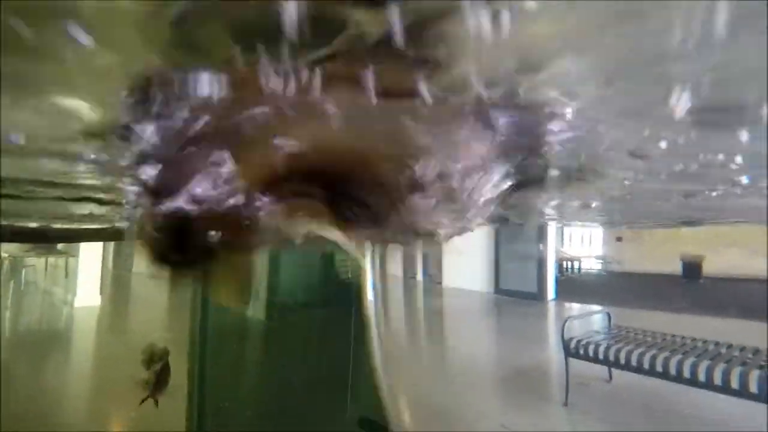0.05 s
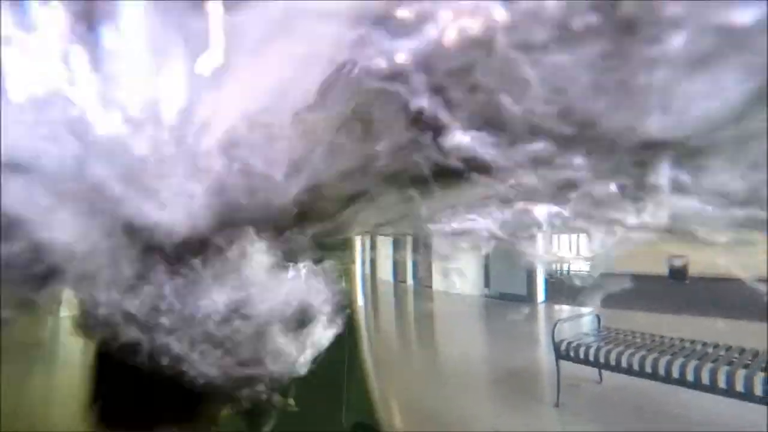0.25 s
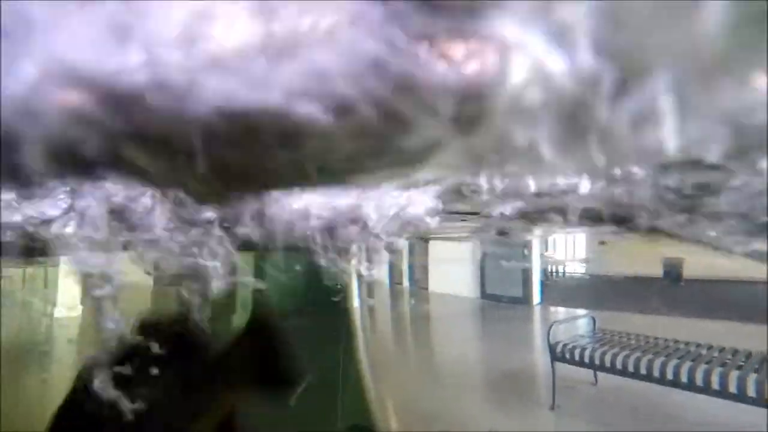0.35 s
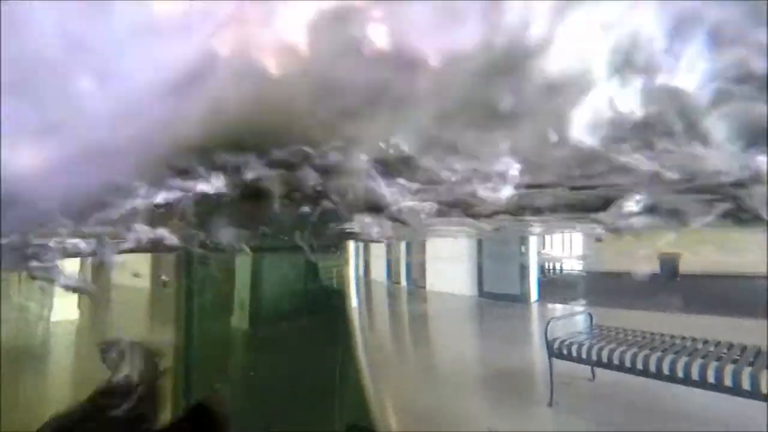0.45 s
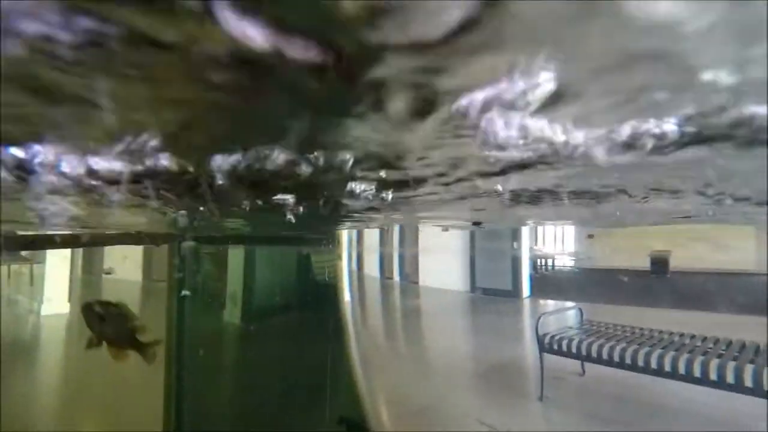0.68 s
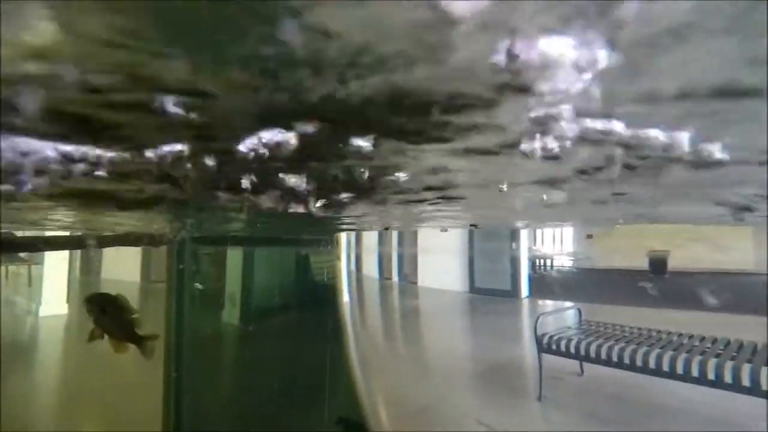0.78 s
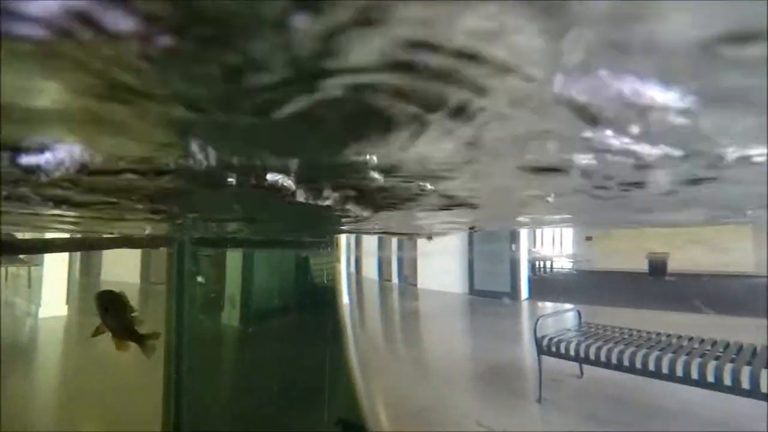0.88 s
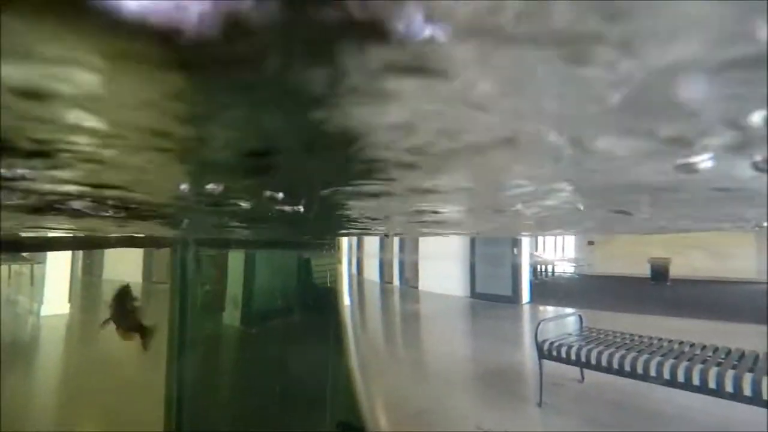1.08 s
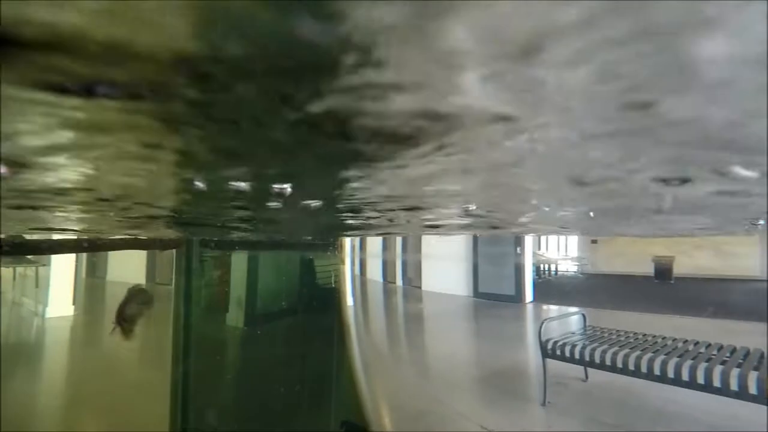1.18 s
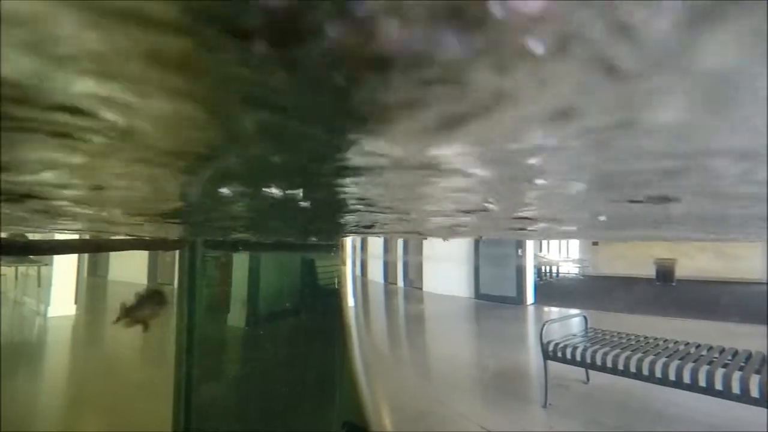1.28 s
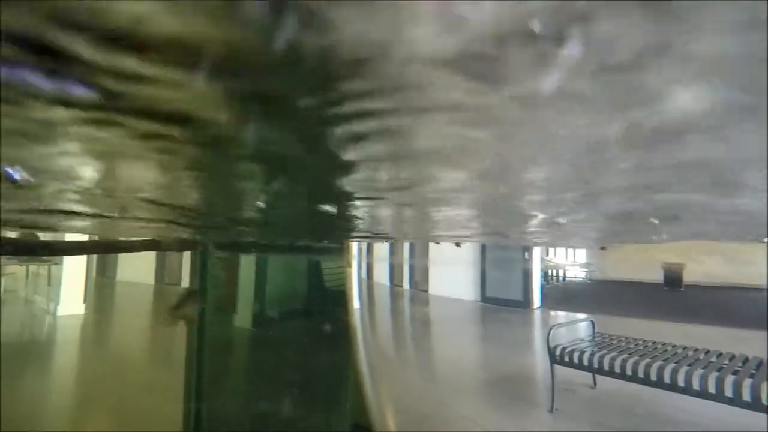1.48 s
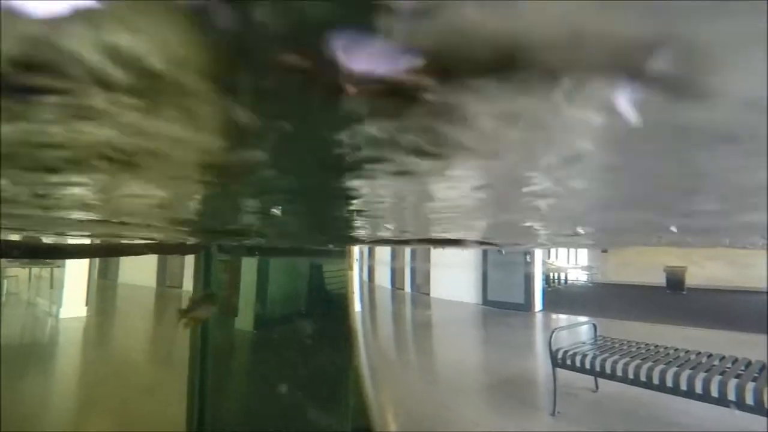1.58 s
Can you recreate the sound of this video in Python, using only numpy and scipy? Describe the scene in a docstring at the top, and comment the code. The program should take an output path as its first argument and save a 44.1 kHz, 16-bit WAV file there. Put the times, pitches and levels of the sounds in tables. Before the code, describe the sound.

A fish splashes at the surface of an indoor tank, heard from a microphone in the water. A soft thud and a few bubbles lead into two quick, fizzy splashes with low thumps, then drops tick and the water settles.

```python
"""A low thud and a few bubbles come first, then a splash: a fish lunges at the surface of an indoor
tank, heard from a waterproof housing in the water. Trapped air resonates as rising bubbles, the
splash throws a dense spray of small ones, and falling drops strike the housing into brief ringing.
Surges rock the housing with low thuds; then the water settles to a faint rumble and stray bubbles."""
import sys
import numpy as np
from scipy import signal
from scipy.io import wavfile
from scipy.ndimage import uniform_filter1d

SR = 44100
rng = np.random.default_rng(int(sys.argv[2]) if len(sys.argv) > 2 else 0)


def output_pcm(signal):
    """Save a mono or channel-first signal as 16-bit PCM at the path in sys.argv[1].

    Samples are clipped to [-1, 1] before scaling.
    """
    pcm = np.clip(np.atleast_2d(signal).T, -1, 1) * 32767
    wavfile.write(sys.argv[1], SR, np.round(pcm).astype(np.int16))


N = 72765

# single bubbles close by (t/s, f/Hz, level/dB, life/s)
NEAR_BUBBLES = [(.047, 590, -28, 0.0068), (0.087, 1040, -31.5, 0.0086), (.157, 650, -26.5, .02),
                (0.1666, 2150, -30, 0.0052), (.2052, 728, -19.5, 0.0037), (.2318, 2080, -22.5, 0.0047),
                (0.242, 3800, -15, 0.0017), (.2514, 2350, -11.5, 0.003), (0.2555, 6100, -12, 0.0016),
                (0.2563, 2000, -12.5, 0.0024), (.2588, 830, -15.5, 0.0027), (0.2636, 1155, -17.5, 0.0035),
                (0.2752, 2120, -14.5, .003), (0.2841, 2690, -14, 0.0056), (0.286, 2240, -10, 0.0018),
                (.302, 701, -20.5, 0.021), (0.3045, 3950, -22, 0.0032), (0.3562, 1800, -5.5, .0025),
                (0.36, 8390, -2.5, .0013), (0.3596, 6270, -9.5, 0.0018), (0.362, 1846, -8.5, .002),
                (0.3662, 7900, -13.5, 0.0011), (.3835, 4545, -26.5, 0.0034), (.4556, 1010, -27, 0.0097),
                (.476, 1830, -31.5, 0.011), (0.577, 1760, -29.5, 0.0027), (0.5846, 3150, -20.5, 0.00095),
                (0.5875, 2500, -26.5, 0.0031), (0.6848, 1850, -34.5, .008), (1.2807, 1540, -24, 0.0045)]
# churning of the water (t/s, spray level/dB, gurgle level/dB)
CHURN_LEVELS = [(0, -52, -52.5), (.12, -54, -43.5), (.218, -43.5, -43.5), (.238, -23.5, -31.5),
                (.262, -20, -21.5), (.275, -29, -41), (.30, -37, -26), (.343, -37.5, -31),
                (.362, -21.5, -28.5), (.388, -39.5, -39), (.445, -42, -45), (.59, -48.5, -51),
                (.665, -61.5, -56), (1.03, -64, -62), (1.65, -66, -67)]
# transmission of small bubbles and slaps through the housing (f/Hz, gain/dB)
TRANSMISSION = [(250, -13.5), (680, 8), (880, -1), (1060, 5), (1350, -7), (2150, 5.5), (2800, -3),
                (3400, -2), (5000, -5), (6400, 7), (7200, -8.5), (8300, -1.5), (11000, -2.5), (13000, -7)]
# drops on the housing (t/s, knock level/dB, snap level/dB, snap f/Hz)
DROP_IMPACTS = [(0.2318, -17.5, -18.5, 7380), (0.2371, -24, -15, 12380), (0.2443, -11, -28, 9200),
                (0.259, -12.5, -23, 12560), (.264, -4, -20, 12940), (0.2825, -11, -21, 9800),
                (0.3597, -2.5, -19, 8660), (.380, -20, -20, 8840), (0.475, -33, -30.5, 7950),
                (.531, -31, -20.5, 8060), (0.6501, -34, -52, 6360), (.680, -30.5, -21.5, 13200),
                (0.6805, -23, -13, 8060), (0.7016, -18.5, -20.5, 13100), (0.72, -30, -20, 12300),
                (0.7722, -34.5, -49.5, 5000), (0.8938, -46, -59.5, 8200), (0.9993, -33, -53, 6320),
                (1.048, -35.5, -37.5, 9800), (1.089, -39.5, -62, 6400), (1.2241, -41, -58.5, 4000)]
# normal modes of the housing (f/Hz, relative level/dB)
HOUSING_MODES = [(1030, -12.5), (1430, -10), (1900, -1), (2326, 0.5), (2787, 1), (3140, -5), (3985, -4.5),
                 (5200, -9)]
# wet slaps of water, and at 1.36 s the faint pop of a small bubble, heard as a short noise burst (t/s,
# level/dB, life/s, upper band edge f/Hz)
WATER_SLAPS = [(0.3565, -17, 0.0034, 10000), (0.365, -24, .007, 6470), (0.7189, -28, 0.0032, 4000),
               (.843, -43, 0.0028, 3036), (1.36, -50, .01, 3900)]
# surges against the housing (t/s, rocking f/Hz, rocking level/dB, life/s, slosh level/dB)
WATER_SURGES = [(.0, 46.6, -21.5, 0.012, -36), (.05, 58.5, -45, 0.0099, -33.5),
                (0.199, 39.2, -31, 0.033, -59), (0.251, 57.4, -16, 0.019, -26.5),
                (.297, 29.83, -13.5, 0.053, -33), (0.363, 70.9, -10, 0.052, -20),
                (.4545, 70, -20.5, 0.041, -26), (0.569, 69, -29.5, 0.014, -39),
                (0.944, 47.4, -36, 0.075, -42.5), (1.025, 66.2, -32.5, 0.076, -40),
                (1.372, 60.8, -33.5, 0.024, -47.5)]
# reverberation of the tank (f/Hz, time to fall 60 dB/s)
TANK_DECAY = [(200, 0.12), (700, 0.17), (3500, .15), (8000, 0.0273)]
# spectral density of the rumble (f/Hz, relative level/dB)
RUMBLE_SPECTRUM = [(10, -4), (30, 0.5), (72, -2.5), (92, -13.5), (122, -15.5), (160, -21), (600, -46.5),
                   (2000, -82)]
# envelope of the rumble (t/s, level/dB)
RUMBLE_ENVELOPE = [(0, -29), (.14, -45.5), (.25, -19.5), (.38, -21), (.5, -33.5), (.66, -45), (1.05, -44),
                   (1.65, -45.5)]
# spectral density of the hiss (f/Hz, relative level/dB)
HISS_SPECTRUM = [(700, -8.5), (1400, -9.5), (2200, -4.5), (3300, -6), (10000, -13.5), (15000, -16),
                 (16000, -32)]

BUBBLE_RISE, BUBBLE_ONSET_CYCLES = 0.05, 0.8  # rise: share of the pitch gained over one life
GULP_START_S, GULP_HZ, GULP_DB, GULP_LIFE_S = 0.4548, 609.6, -18.5, 0.028
FIZZ_DB, FIZZ_POWER = -3, 1.38  # the fizz grows faster than the spray
KNOCK_RISE_S, RING_CYCLES = 0.000043, 36  # a mode falls 60 dB in about this many cycles
SNAP_RING_S, SNAP_NOISE_S, SNAP_NOISE_DB, SNAP_WIDTH_HZ = 0.00072, 0.00095, -1, 1300
SURGE_RISE_S, SLOSH_S, SLOSH_HZ = 0.0035, 0.0069, 853
THUD_BAND_HZ, THUD_S, THUD_DB = (114, 286), 0.013, -3.5  # level relative to the slosh
TANK_DB, HISS_DB = -21, -68


def bubble(hz, life, rise, steepness=2.2):
    """Trapped air is a spring loaded by water: it rings, climbing in pitch as it nears the surface."""
    t = np.arange(0, 4 * life, 1 / SR)
    cycles = np.cumsum(hz * (1 + rise * t / life)) / SR
    onset = 1 - np.exp(-cycles / BUBBLE_ONSET_CYCLES)
    return np.sin(2 * np.pi * cycles) * onset * np.exp(-(t / life) ** steepness)


def flutter(x, depth_db=0.5, cutoff_hz=132):
    """Amplitude modulation: moving water makes a bubble's loudness waver at random."""
    return x * amp(depth_db * band_noise(SR, cutoff_hz)[:len(x)])


def near_bubbles():
    """Single bubbles oscillate freely, and the cavity behind the fish closes with a gliding gulp."""
    out = np.zeros(N)
    for start, hz, db, life in NEAR_BUBBLES:
        add(out, start, amp(db) * flutter(bubble(hz, life, BUBBLE_RISE)))
    gulp = bubble(GULP_HZ, GULP_LIFE_S, rise=0.19, steepness=3.7)
    add(out, GULP_START_S, amp(GULP_DB) * flutter(gulp))
    return out


def swarm(low_hz, high_hz, per_s, cycles, spread_db, sizes=40):
    """Incoherent superposition of many small bubbles, held at a steady overall level."""
    out = np.zeros(N)
    for hz in np.geomspace(low_hz, high_hz, sizes):
        births = rng.random(N) < per_s / sizes / SR
        strength = amp(spread_db * np.minimum(rng.exponential(1, N), 3))
        life = cycles * rng.uniform(0.38, 1.8) / hz
        out += signal.oaconvolve(births * strength, bubble(hz, life, rise=0.0035))[:N]
    out = colour(out, TRANSMISSION)
    power = uniform_filter1d(uniform_filter1d(out ** 2, size=1300), size=1300)
    return out / np.sqrt(abs(power) + 0.02 * np.mean(out ** 2))


def churn():
    """Smaller bubbles resonate higher: stirred water gives a deep gurgle, bright spray and fine fizz."""
    spray = swarm(1250, 4630, per_s=1800, cycles=6.1, spread_db=4.5)
    gurgle = swarm(230, 1224, per_s=600, cycles=3.8, spread_db=3)
    fizz = swarm(4800, 16000, per_s=3800, cycles=9, spread_db=4)
    spray_gain, gurgle_gain = envelope(CHURN_LEVELS, column=1), envelope(CHURN_LEVELS, column=2)
    return spray * spray_gain + gurgle * gurgle_gain + fizz * amp(FIZZ_DB) * spray_gain ** FIZZ_POWER


def knock(t):
    """An impact excites the normal modes of the housing; the higher modes are damped sooner."""
    ring = np.zeros(len(t))
    for hz, db in HOUSING_MODES:
        decay = amp(db - 60 * t * hz / RING_CYCLES)
        ring += rng.choice([-1, 1]) * decay * np.sin(2 * np.pi * hz * rng.uniform(0.93, 1.03) * t)
    ring *= 1 - np.exp(-t / KNOCK_RISE_S)
    return ring / abs(ring).max()


def snap(t, hz):
    """Damped oscillation of a tiny bubble, its spectrum broadened by the noise of the splash."""
    splash = amp(SNAP_NOISE_DB) * band_noise(len(t), SNAP_WIDTH_HZ) * np.exp(-t / SNAP_NOISE_S)
    onset = 1 - np.exp(-t * hz / BUBBLE_ONSET_CYCLES)
    return np.sin(2 * np.pi * hz * t) * onset * (np.exp(-t / SNAP_RING_S) + splash)


def drops():
    """Impulsive excitation: each drop knocks the housing and sets a tiny bubble ringing."""
    out, t = np.zeros(N), np.arange(SR // 20) / SR
    for start, knock_db, snap_db, snap_hz in DROP_IMPACTS:
        add(out, start, amp(knock_db) * knock(t) + amp(snap_db) * snap(t, snap_hz))
    return out


def slaps(low_hz=1100):
    """A sheet of water breaks on the surface, or a small bubble pops: a broadband transient, filtered by the
    housing."""
    out, t = np.zeros(N), np.arange(SR // 20) / SR
    for start, db, life, top_hz in WATER_SLAPS:
        burst = band_noise(len(t), (low_hz, top_hz), "bandpass") * np.exp(-t / life)
        add(out, start, amp(db) * burst)
    return colour(out, TRANSMISSION)


def surges():
    """Each surge lands with a dull slosh and a thud, and rocks the housing in a damped oscillation."""
    out, t = np.zeros(N), np.arange(SR // 2) / SR
    for start, hz, db, life, slosh_db in WATER_SURGES:
        onset = 1 - np.exp(-t / SURGE_RISE_S)
        rocking = np.sin(2 * np.pi * hz * t) * onset * np.exp(-(t / life) ** 2)
        slosh = band_noise(len(t), SLOSH_HZ, order=4) * np.exp(-t / SLOSH_S)
        thud = band_noise(len(t), THUD_BAND_HZ, "bandpass") * np.exp(-t / THUD_S)
        add(out, start, amp(db) * rocking + amp(slosh_db) * (slosh + amp(THUD_DB) * thud))
    return out


def tank_echoes(x):
    """Reverberation: short, dense reflections between the glass walls, in which the treble dies first."""
    hz, t, spectra = signal.stft(rng.standard_normal(SR // 2), SR, nperseg=256)
    decay = amp(-60 * t / at_frequency(TANK_DECAY, hz)[:, None])
    _, tail = signal.istft(spectra * decay, SR, nperseg=256)
    return signal.fftconvolve(x, tail / np.linalg.norm(tail))[:N]


def background():
    """Noise with a continuous spectrum: the low rumble of rocking water over a steady hiss."""
    rumble = unit_rms(colour(rng.standard_normal(N), RUMBLE_SPECTRUM))
    hiss = unit_rms(colour(rng.standard_normal(N), HISS_SPECTRUM))
    return rumble * envelope(RUMBLE_ENVELOPE) + amp(HISS_DB) * hiss


def band_noise(samples, edges_hz, kind="lowpass", order=2):
    """White noise confined to a band, at rms 1."""
    band = signal.butter(order, edges_hz, kind, fs=SR, output="sos")
    return unit_rms(signal.sosfilt(band, rng.standard_normal(samples)))


def colour(x, spectrum):
    """Minimum-phase filtering: a causal response with the given spectrum."""
    log_gain = np.log(amp(at_frequency(spectrum, abs(np.fft.fftfreq(N, 1 / SR)))))
    response = np.exp(np.conj(signal.hilbert(log_gain)))
    return np.fft.ifft(np.fft.fft(x) * response).real


def at_frequency(table, hz):
    """Interpolation on a logarithmic frequency axis."""
    f, value = np.transpose(table)
    return np.interp(np.log(hz + 1), np.log(f + 1), value)


def envelope(table, column=1):
    """Amplitude over time, interpolated in decibels."""
    rows = np.array(table)
    return amp(np.interp(np.arange(N) / SR, rows[:, 0], rows[:, column]))


def amp(db):
    """Amplitude ratio of a level in decibels."""
    return 10 ** (np.asarray(db) / 20)


def unit_rms(x):
    """Normalisation to rms 1."""
    return x / np.sqrt(np.mean(x ** 2) + 1e-20)


def add(mix, start, sound):
    """Superposes a sound from a start time in seconds."""
    part = mix[max(round(start * SR), 0):][:len(sound)]
    part += sound[:len(part)]


def scene():
    """Superposition at one microphone; near bubbles, drops and slaps also reverberate."""
    near = near_bubbles() + drops() + slaps()
    return (near + amp(TANK_DB) * tank_echoes(near) + churn() + surges() + background())[None]


def record(dry, cutoff_hz=15900):
    """Saturation clips peaks at full scale, then a low-pass filter limits the bandwidth."""
    lowpass = signal.firwin(255, cutoff_hz, window=("kaiser", 9), fs=SR)
    return signal.oaconvolve(np.clip(dry, -1, 1), lowpass[None], "same")


dry = scene()
out = record(dry)
output_pcm(out)
```